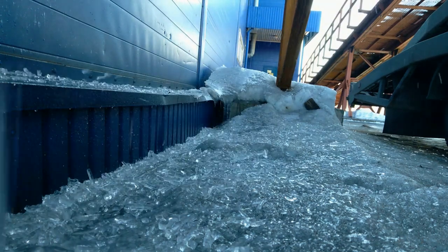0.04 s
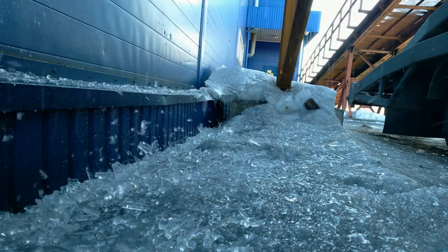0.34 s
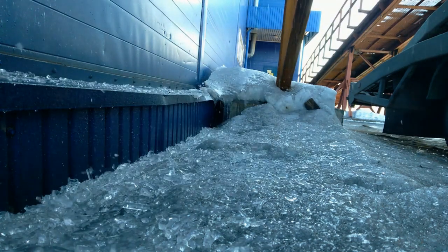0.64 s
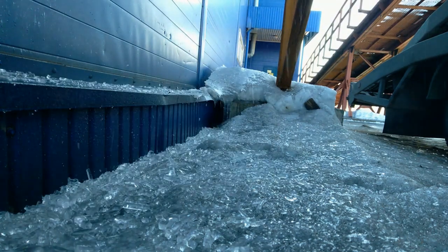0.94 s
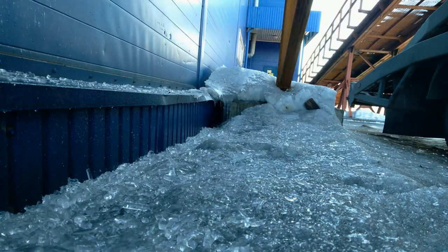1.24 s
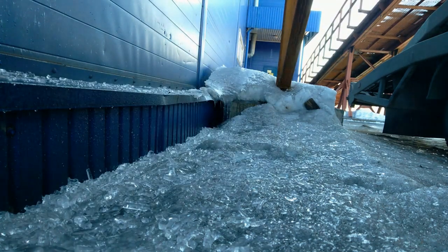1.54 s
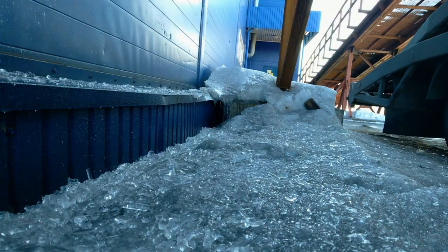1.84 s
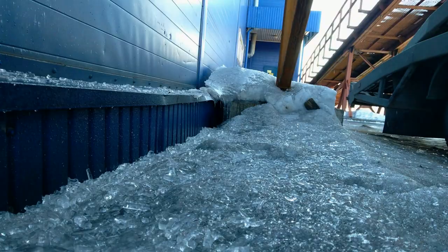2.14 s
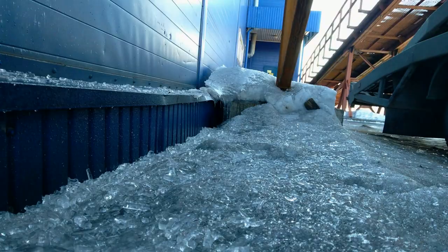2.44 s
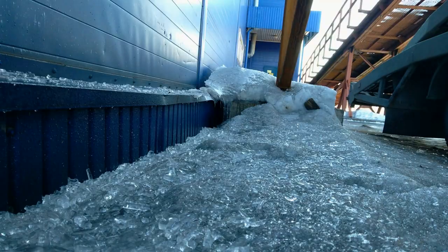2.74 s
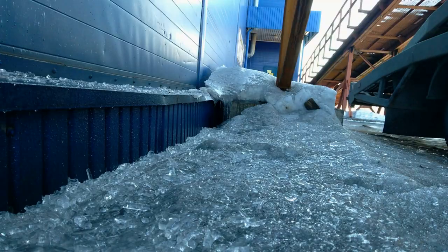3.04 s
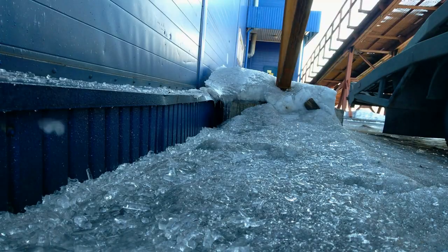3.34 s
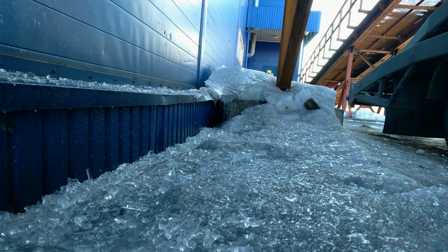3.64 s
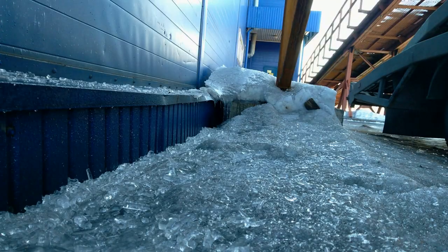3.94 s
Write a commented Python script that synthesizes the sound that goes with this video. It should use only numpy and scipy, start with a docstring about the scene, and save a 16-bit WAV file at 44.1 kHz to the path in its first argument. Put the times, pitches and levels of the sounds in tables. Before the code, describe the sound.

Ice and snow crash down a building with a low roar and crackling shards.

```python
"""A low roar, gusts of air and a hiss of ice grains: ice and snow slide off a tall steel-clad building.
Heavy snow pounds a heap of broken ice, and the structure booms. The roar dies away to a distant machine
drone, while a second shower brings soft snow and ends in a trickle of grains. Single lumps burst into
crumbs, chunks knock, and shards skitter and ring, with a short echo from the walls."""
import sys
import numpy as np
from scipy import signal
from scipy.fft import rfft, irfft
from scipy.io import wavfile
from scipy.ndimage import uniform_filter1d, minimum_filter1d

SR = 44100
rng = np.random.default_rng(int(sys.argv[2]) if len(sys.argv) > 2 else 0)


def store_wav(level_fs):
    """Save 16-bit WAV to argv[1]."""
    pcm = np.round(np.clip(np.atleast_2d(level_fs), -1, 1) * 32767)
    wavfile.write(sys.argv[1], SR, pcm.T.astype(np.int16))


N = 176400  # 4 seconds


def amp(db):
    """Turns decibels into a gain to multiply by."""
    return 10 ** (np.asarray(db) / 20)


def evened(x):
    """Scales a sound to an average power of one."""
    return x / np.sqrt(np.mean(x ** 2) + 1e-20)


def steadied(x, span_s):
    """Takes out chance swells, so that a level curve alone sets the loudness."""
    power = abs(uniform_filter1d(x ** 2, max(int(span_s * SR), 2)))
    return x / np.sqrt(power + 1e-12)


def level(rows, column=1):
    """Gain over time from a dB curve; silent outside it, unless it ends near the scene's edge."""
    times, db = np.transpose(rows)[[0, column]]
    before = db[0] if times[0] < .1 else -120
    after = db[-1] if times[-1] > 3.9 else -120
    return amp(np.interp(np.arange(N) / SR, times, db, left=before, right=after))


def add(mix, start_s, sound):
    """Mixes a sound in at the given time."""
    part = mix[max(round(start_s * SR), 0):][:len(sound)]
    part += sound[:len(part)]


def colour(x, tone, size=8192):
    """Gives a sound the tone in a table, with no ringing ahead of each click."""
    hz, db = np.transpose(tone)
    log_hz = np.log(abs(np.fft.fftfreq(size, 1 / SR)) + 1)
    log_gain = np.log(amp(np.interp(log_hz, np.log(hz + 1), db)))
    taps = np.fft.ifft(np.exp(np.conj(signal.hilbert(log_gain)))).real[:size // 2]
    return signal.fftconvolve(x, taps / np.linalg.norm(taps))[:len(x)]


def noise(tone):
    """Steady noise with the tone in a table."""
    hz, db = np.transpose(tone)
    log_hz = np.log(np.fft.rfftfreq(N, 1 / SR) + 1)
    gain = amp(np.interp(log_hz, np.log(hz + 1), db, right=-np.inf))
    return evened(irfft(rfft(rng.standard_normal(N)) * gain, N))


def clicks(n, per_s, spread_db):
    """Clicks at random times, a few stronger than the rest."""
    strength = amp(spread_db * np.minimum(rng.exponential(1, n), 4))
    return strength * rng.choice([-1., 1.], n) * (rng.random(n) < per_s / SR)


def wall_echo(x, fade_s=0.12):
    """Sound bounces between the steel walls, fading by 60 dB in fade_s."""
    t = np.arange(SR // 2) / SR
    tail = clicks(len(t), per_s=3300, spread_db=0.88) * amp(-60 * t / fade_s) * (t > .005)
    return signal.fftconvolve(x, tail / np.linalg.norm(tail))[:N]


def boom(hz=228, width_hz=10.8, wander=.02, turns_per_s=2.5):
    """The structure booms on one broad note that wanders a little."""
    t = np.arange(N) / SR
    drift = np.interp(t * turns_per_s, np.arange(20), rng.uniform(-1, 1, 20))
    off_note = 2 * (np.fft.fftfreq(N, 1 / SR) - hz) / width_hz
    note = np.fft.ifft(np.fft.fft(rng.standard_normal(N)) / (1 + off_note ** 2))
    bend = np.exp(2j * np.pi * np.cumsum(hz * wander * drift) / SR)
    return evened((note * bend).real)


# How loud the deep rumble of the falling mass is: (time [s], level [dB])
RUMBLE_LEVEL = [(0, -18), (.55, -16), (1.0, -18), (1.4, -18), (1.75, -19.5), (2.05, -23), (2.3, -23.5),
                (2.65, -29), (3.2, -30.5), (3.65, -31.5), (3.87, -28), (4.0, -28)]
# The tone of that rumble: (frequency [Hz], level [dB])
RUMBLE_TONE = [(30, -25), (60, 0.5), (100, -11.5), (165, 0), (230, -3), (280, -0.5), (355, -3), (450, -8),
               (700, -18), (1000, -31.5), (1500, -78)]
# How loud the higher, rushing part of the roar is: (time [s], level [dB])
RUSH_LEVEL = [(0, -27), (.35, -25.5), (.6, -29.5), (1.0, -30.5), (1.3, -31.5), (1.8, -36), (2.5, -39.5),
              (2.9, -45), (3.3, -47.5), (3.7, -53), (3.9, -48), (4.0, -54)]
# The tone of that rush: (frequency [Hz], level [dB])
RUSH_TONE = [(250, -42), (450, 2.5), (600, 0.5), (1000, -4.5), (1500, -12), (2000, -19), (2400, -31.5),
             (3200, -39.5), (7000, -49.5), (9500, -50), (12000, -65.5), (16000, -77.5)]


def roar():
    """The sliding mass rumbles, rushes and makes the structure boom, then sinks into the distant drone."""
    rumble = amp(-0.38) * steadied(noise(RUMBLE_TONE), 0.18)
    booming = amp(-8.5) * steadied(boom(), 0.27)
    rush = amp(2) * noise(RUSH_TONE) * level(RUSH_LEVEL)
    return (rumble + booming) * level(RUMBLE_LEVEL) + rush


# How hard heavy snow pounds the heap: (time [s], level [dB])
POUNDING_LEVEL = [(0.0, -21), (0.03, -20.5), (0.29, -18), (0.31, -11), (0.75, -17), (0.77, -12),
                  (0.79, -14.5), (2.24, -26), (2.25, -31), (3.96, -31.5)]
# The dull tone of the pounding: (frequency [Hz], level [dB])
POUNDING_TONE = [(40, -27), (68, -6.5), (88, 0), (105, -0.5), (130, -2.5), (160, -18.5), (260, -50),
                 (600, -87.5)]


def pounding():
    """Heavy snow lands on the heap with a low thudding noise."""
    return amp(-1.2) * steadied(noise(POUNDING_TONE), 0.14) * level(POUNDING_LEVEL)


# How strong the gusts are: (time [s], level [dB])
GUST_LEVEL = [(0, -18), (.2, -12), (.35, -15.5), (.55, -30), (.66, -13), (.8, -25), (.95, -29), (1.1, -18),
              (1.27, -14), (1.41, -8), (1.55, -19), (1.67, -25), (1.74, -13.5), (1.87, -23.5),
              (2.22, -21.5), (2.35, -33.5), (2.6, -43), (3.2, -43), (3.65, -35.5), (3.77, -24),
              (3.85, -41.5), (4.0, -26)]
# The very deep tone of buffeting air: (frequency [Hz], level [dB])
GUST_TONE = [(5, -9), (14, -0.5), (24, 10.5), (36, 1.5), (50, -6.5), (75, -22), (200, -61), (600, -95)]


def gusts():
    """Moving air buffets in short, deep puffs."""
    return amp(2) * steadied(noise(GUST_TONE), 0.054) * level(GUST_LEVEL)


# How loud the soft snow is: (time [s], level [dB])
SNOW_LEVEL = [(2.15, -57), (2.185, -35), (2.3, -37), (2.6, -47), (2.74, -45), (2.9, -50), (3.2, -53),
              (4.0, -65)]
# The tone of falling powder: (frequency [Hz], level [dB])
SNOW_TONE = [(400, -15), (1000, -3), (1800, 5.5), (3000, -0.5), (5000, -1.5), (7500, -0.5), (10000, -22),
             (12500, -28), (16000, -30)]


def soft_snow():
    """Soft snow rushes down with the second shower as a smooth hiss."""
    return noise(SNOW_TONE) * level(SNOW_LEVEL)


def grains(per_s, spread_db, ring_scale_s, sizes=28):
    """Each ice grain ticks as it lands and rings briefly; every size has its own note and fade."""
    impacts = clicks(N, per_s, spread_db)
    size = rng.integers(0, sizes, N)
    out, t = np.zeros(N), np.arange(512) / SR
    for k, hz in enumerate(np.linspace(2500, 16000, sizes)):
        fade_s = ring_scale_s * rng.uniform(0.18, 11)
        ring = np.sin(2 * np.pi * hz * t) * np.exp(-t / fade_s)
        tick = rng.standard_normal(len(t)) * np.exp(-t / 0.0013)
        out += signal.oaconvolve(impacts * (size == k), 0.4 * evened(ring) + evened(tick))[:N]
    return out


def tinkles(sizes=60, fade_s=0.0072):
    """Thin flakes of many sizes land, each size ringing on its own high note."""
    impacts = clicks(N, per_s=260, spread_db=1.9)
    size = rng.integers(0, sizes, N)
    notes_hz = rng.uniform(6200, 15500, sizes)
    out, t = np.zeros(N), np.arange(1024) / SR
    for at in np.flatnonzero(impacts):
        ring = np.sin(2 * np.pi * notes_hz[size[at]] * t) * np.exp(-t / fade_s)
        add(out, at / SR, impacts[at] * ring)
    return evened(out)


# Two showers of grains and a last trickle: (time [s], hiss level [dB], fizz level [dB])
FIRST_SHOWER = [(0.0, -29, -37), (0.056, -38.5, -50), (0.072, -33.5, -38), (0.15, -33.5, -39),
                (0.18, -33.5, -31), (0.38, -37, -44), (0.45, -38.5, -36), (0.528, -42.5, -47),
                (0.982, -52.5, -54.5), (0.986, -46.5, -48), (1.046, -55.5, -61), (1.142, -56.5, -56),
                (1.2, -97, -81)]
SECOND_SHOWER = [(2.0, -72, -92), (2.074, -56, -81), (2.14, -63, -80), (2.174, -40, -41),
                 (2.19, -33.5, -47), (2.288, -33, -35), (2.31, -30.5, -43), (2.44, -46, -56),
                 (2.678, -46, -56), (2.716, -34, -48), (2.796, -45.5, -72), (2.94, -65, -76)]
TRICKLE = [(2.92, -58, -70), (2.95, -38, -52), (3.0, -32, -52), (3.15, -54, -61), (3.22, -45, -58),
           (3.4, -43, -54), (3.55, -46.5, -55), (3.6, -58, -66), (3.8, -46.5, -60), (4.0, -51.5, -67)]
# The tone of the grains' main hiss: (frequency [Hz], level [dB])
HISS_TONE = [(1000, -35), (2500, -5), (4000, -8), (5800, -2.5), (7400, 2.5), (8600, -1.5), (10000, -10),
             (11500, -22.5), (16000, -42.5)]
# The bright fizz of the nearest grains: (frequency [Hz], level [dB])
FIZZ_TONE = [(6000, -32), (9000, -8), (10500, -5), (12500, -7), (14500, -6), (16000, -6.5)]


def shower(curve, per_s, ring_scale_s, hiss_db, fizz_db, clump_s=.018):
    """Ice grains rain on the heap in clumps; the nearest add a bright fizz."""
    hail = evened(grains(per_s, spread_db=2.6, ring_scale_s=ring_scale_s)) + amp(-8.5) * tinkles()
    span = int(clump_s * SR)
    clumps = uniform_filter1d(rng.standard_normal(N), span)
    clumps = evened(uniform_filter1d(clumps, span // 2))  # a quick, random flutter in loudness
    hiss = amp(hiss_db + .9 * clumps) * steadied(colour(hail, HISS_TONE), 0.15)
    fizz = amp(fizz_db + 1.8 * clumps) * steadied(colour(hail, FIZZ_TONE), .08)
    return hiss * level(curve) + fizz * level(curve, column=2)


# How loud the crackle of larger grains is: (time [s], level [dB])
CRACKLE_LEVEL = [(0, -39), (1.0, -53.5), (1.25, -93), (2.12, -96), (2.2, -45), (2.75, -63), (3.4, -55),
                 (4.0, -68)]
# The tone of hard ice, shared with the shards below: (frequency [Hz], level [dB])
HARD_ICE_TONE = [(1000, -27.5), (2500, -9), (7800, 0.5), (11000, -5.5), (16000, 1.5)]


def crackle():
    """Larger grains land and tick one by one."""
    ticks = grains(per_s=260, spread_db=3.5, ring_scale_s=.0003)
    return level(CRACKLE_LEVEL) * steadied(colour(ticks, HARD_ICE_TONE), 0.17)


# Runs of loose bits: (middle time [s], level [dB], half length [s], note [Hz])
RATTLES = [(1.057, -55, 0.045, 3000), (1.7, -65.5, .08, 3700), (2.073, -58.5, 0.053, 3100),
           (2.065, -59.5, .04, 6700)]


def rattles():
    """Loose bits rattle across the heap in short runs, each around its own note."""
    out, t = np.zeros(N), np.arange(N) / SR
    bits = grains(per_s=1500, spread_db=2, ring_scale_s=.0003)
    for middle_s, db, half_s, hz in RATTLES:
        band = signal.butter(2, [hz / 1.2, hz * 1.2], "band", fs=SR, output="sos")
        swell = np.exp(-((t - middle_s) / half_s) ** 2)
        out += amp(db) * swell * steadied(signal.sosfilt(band, bits), .02)
    return out


# Single shards that click: (time [s], level [dB], middle of their notes [Hz])
SHARDS = [(.305, -29, 6800), (.384, -18, 6000), (.456, -20, 12000), (.495, -27, 12000), (.6295, -29, 8500),
          (0.7088, -22.5, 8100), (0.712, -30, 7500), (.83, -27, 11500), (.8635, -32, 12500),
          (.8785, -31, 13000), (.932, -31, 4200), (1.26, -57, 4020), (1.375, -54, 3500),
          (2.938, -22.5, 10100), (2.962, -18, 6040), (3.1285, -26, 13000), (3.236, -23.5, 8000),
          (3.288, -24, 9100), (3.325, -25, 11000), (3.4345, -31, 13000), (3.5698, -38, 13000),
          (3.6542, -22, 8350), (3.66, -28, 5430), (3.8065, -31.5, 9400), (3.921, -32, 6000)]
# Thin splinters that ring: (time [s], note [Hz], level [dB])
SPLINTERS = [(.073, 8800, -20), (0.219, 8800, -22), (.27, 13950, -26), (3.034, 7500, -27),
             (3.276, 9000, -34), (3.287, 7660, -26), (3.326, 14900, -30), (3.516, 8940, -30),
             (3.5213, 9050, -30)]


def shards(notes=8, note_spread=0.16, crack_s=.001, chink_s=0.0012, ring_s=0.0024):
    """Hard pieces crack and chink with a cluster of short notes; thin splinters ring on just one."""
    ticks, rings, t = np.zeros(N), np.zeros(N), np.arange(SR // 16) / SR
    for start_s, db, hz in SHARDS:
        notes_hz = hz * (1 + note_spread * rng.uniform(-1, 1, (notes, 1)))
        waves = np.sin(2 * np.pi * (notes_hz * t + rng.random((notes, 1))))
        chink = waves.sum(0) / np.sqrt(notes / 2) * np.exp(-t / chink_s)
        crack = rng.standard_normal(len(t)) * np.exp(-t / crack_s)
        add(ticks, start_s, amp(db) * (.5 * chink + amp(-3) * crack))
    for start_s, hz, db in SPLINTERS:
        add(rings, start_s, amp(db) * np.sin(2 * np.pi * hz * t) * np.exp(-t / ring_s))
    return colour(ticks, HARD_ICE_TONE) + rings


# Solid chunks landing: (time [s], level [dB], lowest note [Hz])
CHUNKS = [(2.958, -27.5, 1228), (3.062, -28, 1378), (3.14, -35, 1763)]
# The notes in each chunk: (pitch [times the lowest note], level [dB], time to fade by 60 dB [s])
CHUNK_NOTES = [(1, -3.5, 0.055), (1.41, -6, 0.066), (1.7, -10, .07), (3.46, -9, .06)]


def chunks():
    """Solid chunks land with a ringing knock of a few notes, higher the smaller the chunk."""
    out, t = np.zeros(N), np.arange(SR // 6) / SR
    for start_s, db, hz in CHUNKS:
        for ratio, note_db, fade_s in CHUNK_NOTES:
            ring = amp(db + note_db - 60 * t / fade_s) * np.sin(2 * np.pi * hz * ratio * t)
            add(out, start_s, rng.choice([-1., 1.]) * ring)
    return out


# Lumps that burst:
# (time [s], crumb level [dB], crumb fade time [s], knock level [dB], low edge of the knock [Hz])
LUMPS = [(0.795, -36, 0.011, -47.5, 3020), (.987, -48, 0.018, -51, 2000), (2.709, -32.5, 0.027, -61, 2000),
         (2.9564, -32, 0.024, -30, 1000), (2.975, -33, 0.017, -43, 1510), (3.0616, -29.5, 0.033, -32, 1110),
         (3.086, -32.5, 0.042, -55, 1800), (3.139, -37.5, 0.023, -43, 1300),
         (3.3112, -31.5, 0.0066, -54, 2500), (3.363, -37, 0.027, -50, 2020), (3.454, -36, 0.016, -50, 2480),
         (3.655, -33.5, 0.014, -48, 3200), (3.7557, -39, 0.014, -66, 3000),
         (3.8347, -39.5, 0.029, -56, 2800)]
# The tone of scattering crumbs: (frequency [Hz], level [dB])
CRUMB_TONE = [(1000, -19), (2500, -22), (4000, -10), (6000, -4.5), (7800, -0.5), (9000, -4), (11000, -8),
              (14000, -9), (16000, -8.5)]


def lumps(knock_s=0.019):
    """Each lump knocks on the heap and bursts into crumbs whose patter dies away."""
    crumbs, knocks, t = np.zeros(N), np.zeros(N), np.arange(SR // 4) / SR
    patter = steadied(grains(per_s=2200, spread_db=-2.5, ring_scale_s=.0007), 0.011)
    for start_s, crumb_db, fade_s, knock_db, edge_hz in LUMPS:
        pick = rng.integers(0, N - len(t))
        add(crumbs, start_s, amp(crumb_db) * patter[pick:pick + len(t)] * np.exp(-t / fade_s))
        cut_lows = signal.butter(4, edge_hz, "high", fs=SR, output="sos")
        soften_highs = signal.butter(1, edge_hz * 1.1, "low", fs=SR, output="sos")
        crush = signal.sosfilt(cut_lows, rng.standard_normal(len(t)))
        crush = signal.sosfilt(soften_highs, crush)
        body = signal.iirpeak(edge_hz * 1.25, Q=4, fs=SR)  # the lump rings just above the low edge
        knock = evened(crush + 1.8 * signal.lfilter(*body, crush))
        add(knocks, start_s, amp(knock_db) * knock * np.exp(-t / knock_s))
    return colour(crumbs, CRUMB_TONE) + knocks


def scene():
    """Mixes everything into one channel; only the sharp hits get an echo."""
    hits = lumps() + chunks() + shards() + crackle() + rattles()
    showers = (shower(FIRST_SHOWER, per_s=3000, ring_scale_s=0.00098, hiss_db=0.2, fizz_db=-3.0)
               + shower(SECOND_SHOWER, per_s=7000, ring_scale_s=0.00037, hiss_db=-1.0, fizz_db=0.0)
               + shower(TRICKLE, per_s=2000, ring_scale_s=0.0014, hiss_db=-7.5, fizz_db=3.5))
    background = roar() + pounding() + gusts() + soft_snow()
    return (background + showers + hits + amp(-13) * wall_echo(hits))[None]


def record(dry, ceiling=.9, span=441, top_hz=15950):
    """Smoothly turns down any peak above the ceiling, then cuts the very highest treble."""
    gain = np.minimum(ceiling / (abs(dry) + 1e-9), 1)
    held = minimum_filter1d(gain, 2 * span)
    smooth = uniform_filter1d(uniform_filter1d(held, span), span)
    treble_cut = signal.firwin(511, top_hz, window=("kaiser", 8), fs=SR)
    return signal.oaconvolve(dry * smooth, treble_cut[None], "same")


dry = scene()
out = record(dry)
store_wav(out)
```